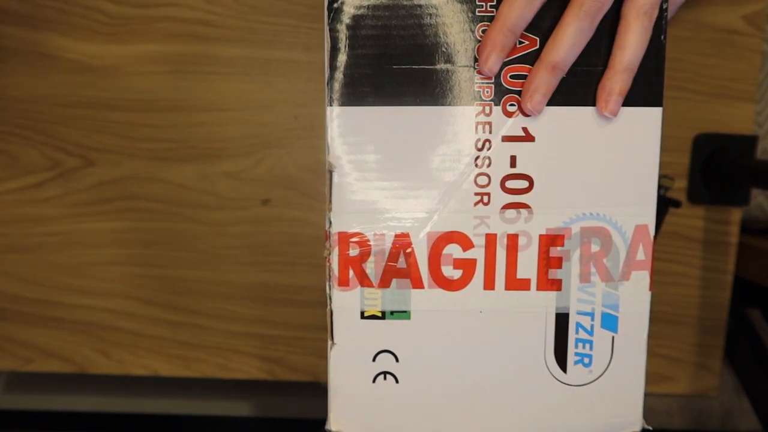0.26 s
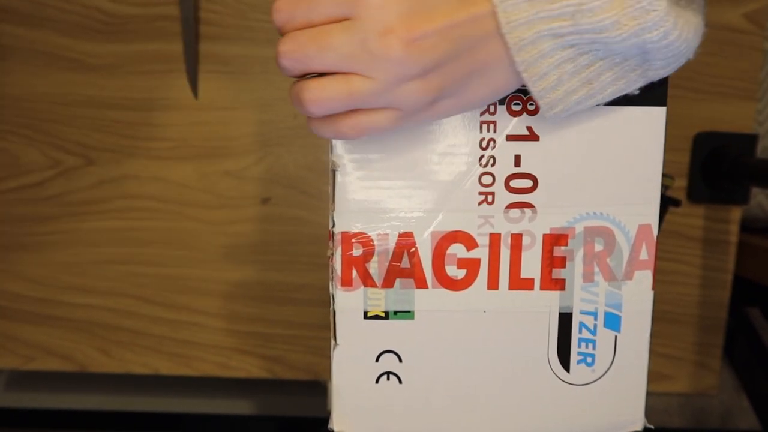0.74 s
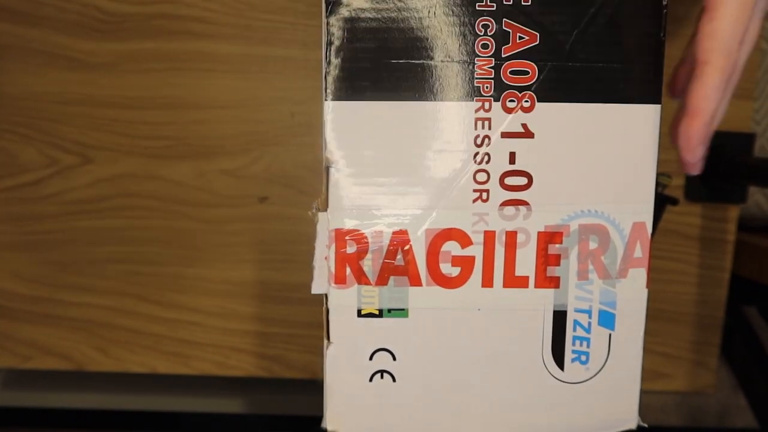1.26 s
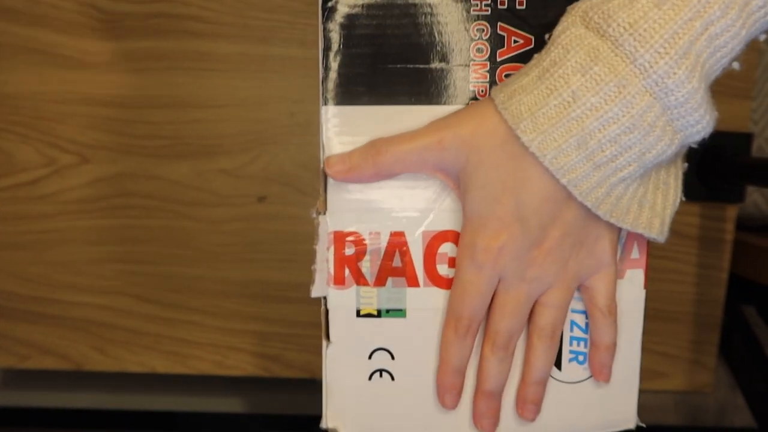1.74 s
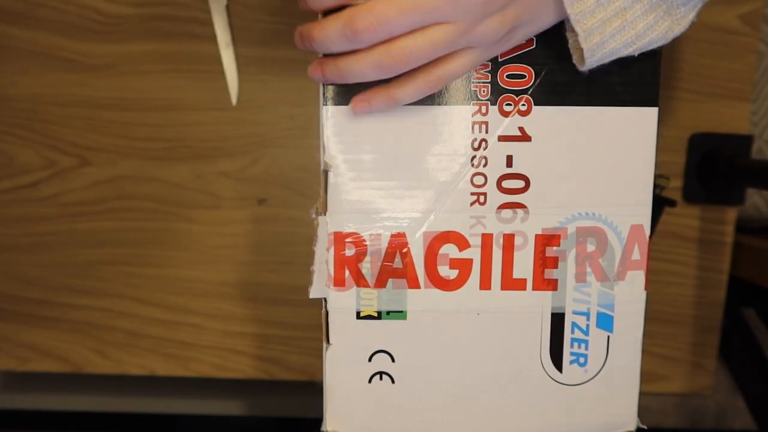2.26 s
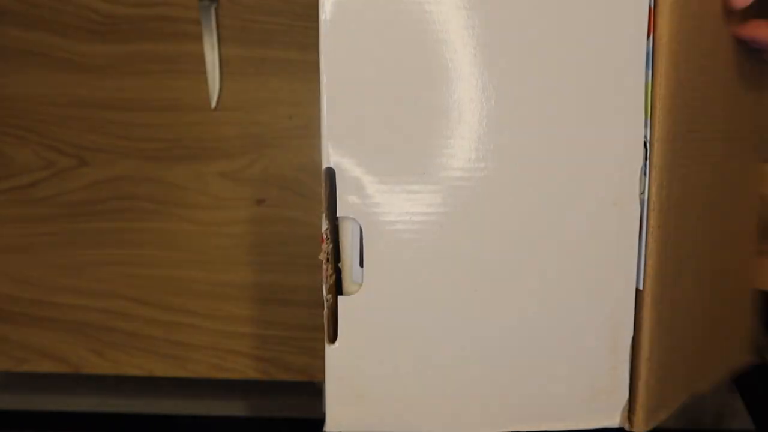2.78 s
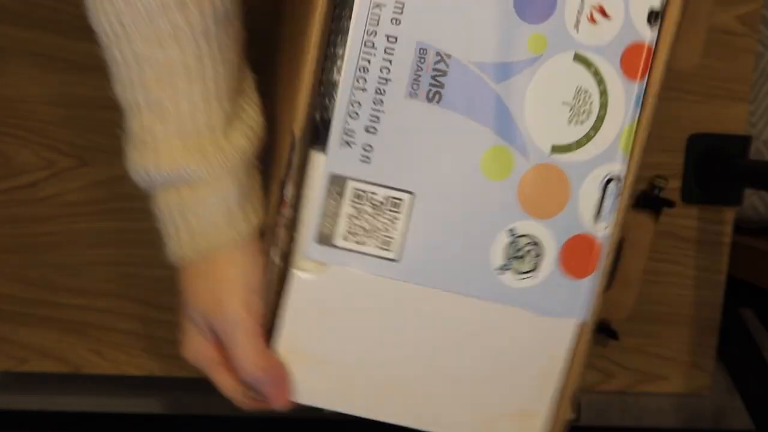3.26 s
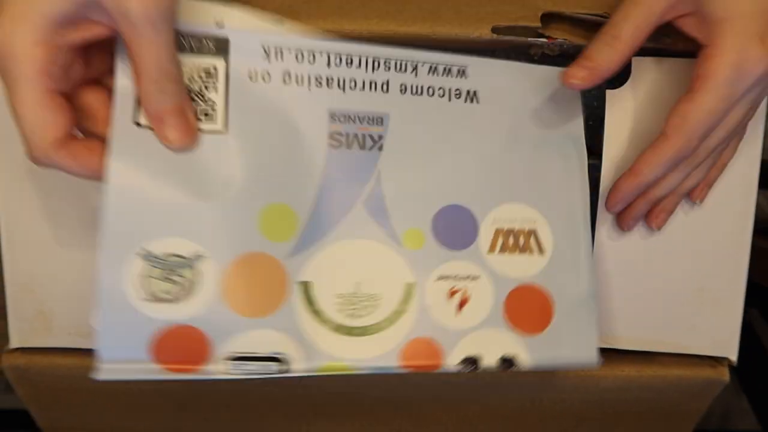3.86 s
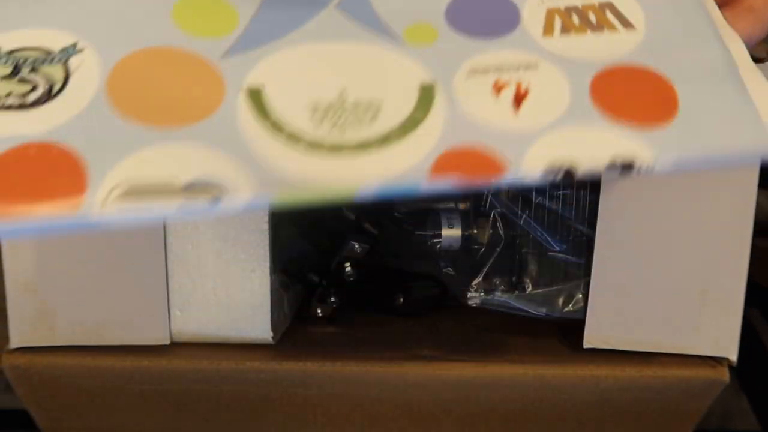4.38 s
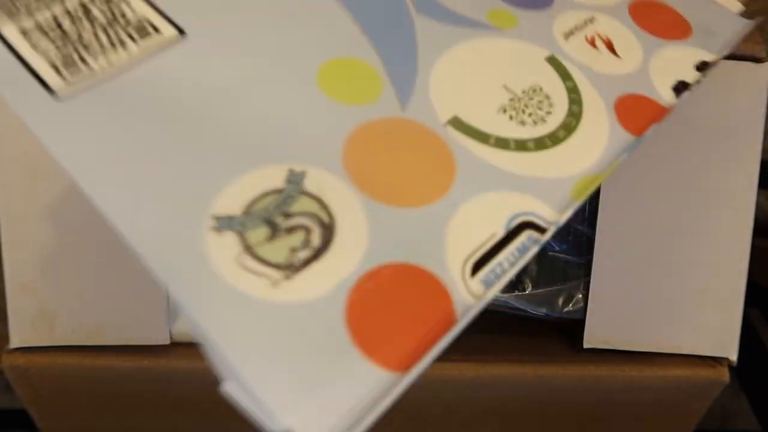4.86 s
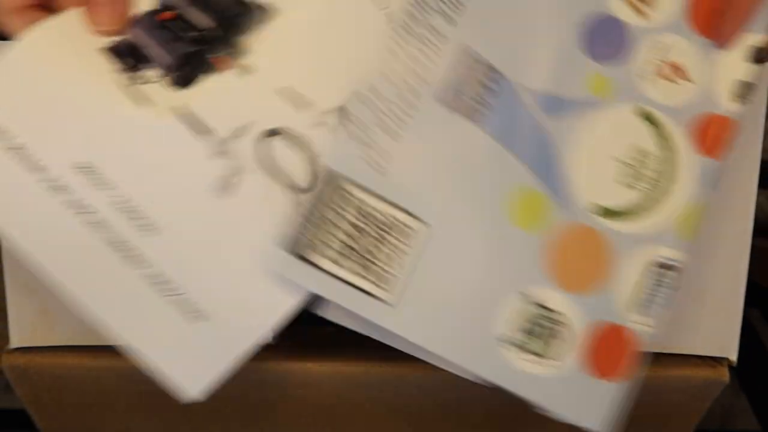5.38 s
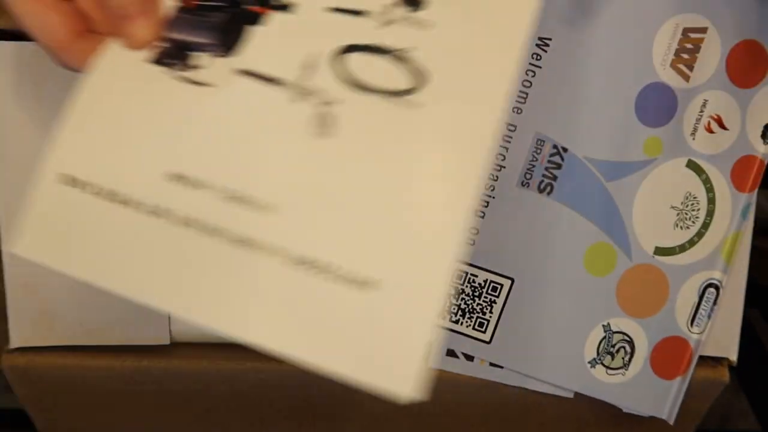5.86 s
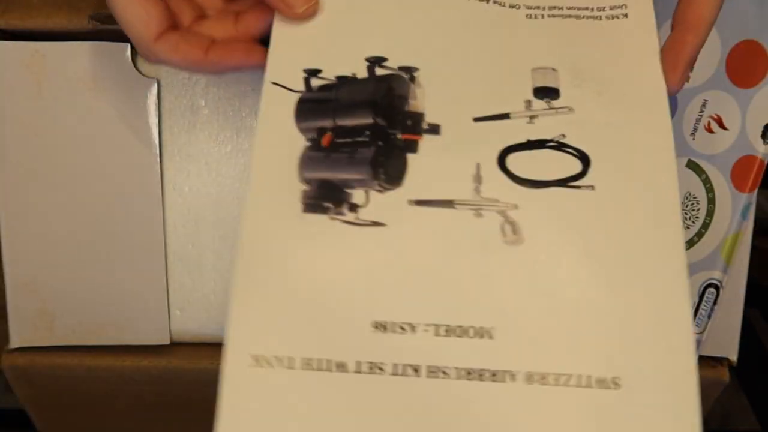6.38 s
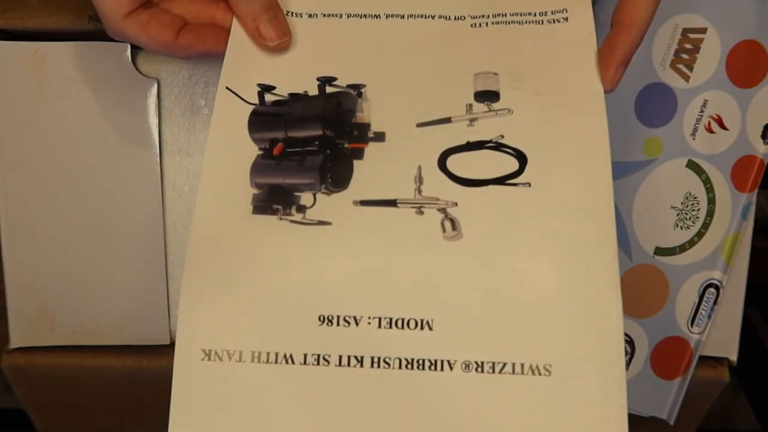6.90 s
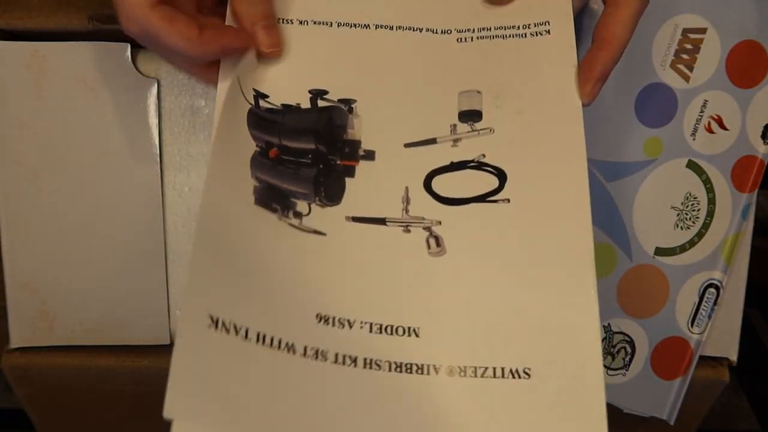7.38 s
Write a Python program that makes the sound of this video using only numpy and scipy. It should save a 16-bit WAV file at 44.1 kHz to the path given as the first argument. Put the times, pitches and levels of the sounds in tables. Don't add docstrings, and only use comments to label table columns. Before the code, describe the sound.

Close handling of a carton: jerky hollow scrapes and taps, small snaps of tape, then thin sheets crinkling and sliding, fading to soft paper rustles.

```python
import sys
import numpy as np
from scipy import signal
from scipy.fft import rfft, irfft, next_fast_len
from scipy.io import wavfile

SR = 44100
rng = np.random.default_rng(int(sys.argv[2]) if len(sys.argv) > 2 else 0)


def ratio_of_db(decibels):
    return 10 ** (np.asarray(decibels, float) / 20)


def put_to_file(sound):
    columns = np.atleast_2d(sound).T
    safe = np.clip(columns, -1, 1)
    whole_steps = np.round(safe * 32767)
    wavfile.write(sys.argv[1], SR, whole_steps.astype(np.int16))


N = 336818
BAND_EDGES_HZ = 400 * 1.085 ** np.arange(47) - 365


def in_time(rows):
    s, *columns = np.transpose(rows)
    return np.array([np.interp(np.arange(N) / SR, s, column) for column in columns])


def at_hz(points, hz):
    point_hz, point_db = np.array(points).T
    return np.interp(np.log(hz), np.log(point_hz), point_db)


def rms_one(x):
    return x / np.sqrt(np.mean(x ** 2) + 1e-20)


def drift(rate_hz):
    r = np.exp(-2 * np.pi * rate_hz * 40 / SR)
    slow = signal.lfilter([1], [1, -2 * r, r * r], rng.standard_normal(N // 40 + 2002))[2000:]
    return np.interp(np.arange(N) / 40, np.arange(len(slow)), rms_one(slow))


def ring(push, hz, t60):
    r, w = ratio_of_db(-60 / (t60 * SR)), 2 * np.pi * hz / SR
    radiated = np.sqrt(0.5 - 0.5 * r * r) * np.array([1, 0, -1])
    return signal.lfilter(radiated, [1, -2 * r * np.cos(w), r * r], push + 1e-18)


def soft(x, hz):
    return signal.sosfilt(signal.butter(2, min(hz, 9000), fs=SR, output="sos"), x)


def grains(per_s, spread_db, smooth):
    caught = rng.random(N) < per_s / SR
    sizes = ratio_of_db(spread_db * np.minimum(rng.exponential(1, N), 4)) * caught
    return rms_one(smooth + rms_one(sizes))


def crackle(per_s, strength):
    flipped = rng.random(N) < per_s / SR
    flips = strength * np.minimum(rng.exponential(1, N), 2) * flipped
    return 1 + signal.lfilter([1], [1, -np.exp(-1 / (0.0024 * SR))], flips)


def bank(gains, side_table, sizes):
    out = np.zeros((2, N))
    white = sizes * rng.standard_normal((2, 2, N))
    for k, (low, high) in enumerate(zip(BAND_EDGES_HZ, BAND_EDGES_HZ[1:])):
        band = signal.butter(2, [low, high], "band", fs=SR, output="sos")
        mid, side = signal.sosfilt(band, gains[k] * white[k % 2])
        out += mid + ratio_of_db(at_hz(side_table, low)) * side * [[1], [-1]]
    return out


def stroke(s, rise, fall):
    at = np.arange(max(round((s - 0.16) * SR), 0), min(round((s + 0.2) * SR), N))
    t = at / SR - s
    swell = (-t / max(rise, 1e-3)) ** 2.92
    decay = abs(t / max(fall, 1e-3)) ** 1.05
    return at, np.exp(-0.9 * np.where(t < 0, swell, decay))


# peak in seconds, swell in seconds, panel level in dB, panel pitch in Hz.
JOLTS = [(0.08, 0.0036, -59.5, 191), (0.275, 0.011, -28, 450), (0.318, 0.011, -32.5, 183),
         (0.376, 0.022, -30, 303), (0.459, 0.015, -26.5, 386), (0.504, 0.0073, -26, 182),
         (0.558, 0.012, -26, 160), (0.604, 0.025, -33.5, 217), (1.374, 0.017, -35.5, 340),
         (1.63, 0.0088, -27.5, 312), (1.679, .011, -31, 166), (1.77, 0.012, -32, 363),
         (1.805, 0.011, -22, 312), (1.928, 0.057, -36, 340), (1.97, 0.0091, -31, 197),
         (2.216, 0.0092, -56, 780), (2.388, 0.018, -36, 356), (2.562, 0.018, -34.5, 177),
         (2.65, 0.047, -51.5, 168), (4.293, 0.0092, -82, 600)]
# peak in seconds, fall in seconds, panel level in dB, panel pitch in Hz.
TAPS = [(0.405, 0.0075, -29.5, 160), (0.862, 0.012, -44, 184), (1.069, 0.0036, -42, 1500),
        (1.288, 0.013, -52.5, 257), (1.465, 0.0033, -18, 327), (1.55, 0.0048, -35, 160),
        (1.712, 0.0071, -15.5, 200), (2.03, 0.0064, -44, 1400), (2.072, 0.0044, -36, 1520),
        (2.134, .0086, -32.5, 555), (2.509, 0.0055, -35, 214), (2.691, 0.014, -29, 174),
        (2.958, 0.0029, -50, 1020), (3.766, 0.039, -47.5, 337), (3.901, 0.014, -24, 630),
        (4.236, 0.013, -29, 800), (5.209, 0.0054, -44, 124), (5.622, 0.02, -42.5, 940),
        (6.18, 0.018, -54, 620), (6.261, 0.013, -60.5, 816), (7.032, 0.013, -52, 1070)]
# peak in seconds, rise in seconds, fall in seconds, panel level in dB, panel pitch in Hz.
SCRAPES = [(0.247, 0.014, .022, -44.5, 696), (0.741, 0.015, .069, -62.5, 436),
           (0.81, 0.02, .022, -45.5, 900), (0.935, 0.023, .016, -51.5, 303),
           (0.983, 0.014, .03, -43.5, 770), (1.43, 0.009, .024, -56, 318), (1.851, 0.0074, .02, -38.5, 357),
           (1.884, 0.0077, 0.0038, -22.5, 384), (2.104, 0.019, .033, -46, 690),
           (2.297, 0.011, .033, -30.5, 733), (2.746, 0.0033, .051, -48, 212),
           (3.034, 0.0093, .021, -49, 123), (3.4, 0.08, .075, -44, 645), (3.627, 0.0054, .064, -51, 300),
           (3.705, 0.017, .036, -56.5, 314), (3.855, 0.019, .14, -46.5, 623),
           (3.968, 0.039, .019, -37.5, 1080), (4.877, 0.019, .012, -50, 322),
           (5.645, 0.045, .036, -52, 700), (5.85, 0.012, .022, -43, 736), (6.849, .02, 0.03, -63, 744),
           (7.432, 0.011, .032, -45, 1460), (7.602, 0.0031, .037, -57.5, 810)]
# peak in seconds, rise in seconds, fall in seconds, scratch level in dB, thinness in dB.
BRUSHES = [(1.576, .0011, .0092, -37.5, -2.5), (2.339, 0.012, .006, -38, 5),
           (2.826, 0.0039, 0.036, -59.5, -4.5), (3.2, 0.015, 0.041, -48.5, 24.5),
           (3.253, 0.0206, 0.011, -49.5, 20.5), (3.58, 0.016, 0.0094, -56, -2),
           (4.102, .02, 0.036, -48.5, 8), (4.496, 0.026, 0.012, -57, 6), (4.651, 0.0011, 0.056, -55, 2),
           (4.671, .001, 0.0025, -53, 20), (4.78, 0.044, 0.0029, -75, 46), (4.928, 0.011, 0.041, -57, 4),
           (5.024, .0037, 0.0062, -50, 3), (5.053, 0.0129, 0.033, -52, 18), (5.137, 0.0043, 0.054, -63, 18),
           (5.243, 0.02, 0.015, -54, 3.5), (5.423, 0.046, 0.035, -48.5, 24),
           (7.219, 0.048, 0.0083, -47, 4.5), (7.298, 0.041, 0.14, -57, 7.5)]


def scuffs():
    def scratch(base_db, panel_db):
        return base_db - 0.11 * (panel_db + 42.5)

    jolts = [(s, swell, 0.0067 + 0.05 * swell, db, hz, scratch(-12, db)) for s, swell, db, hz in JOLTS]
    taps = [(s, 0.0026, fall, db, hz, scratch(-11, db)) for s, fall, db, hz in TAPS]
    scrapes = [(s, rise, fall, db, hz, scratch(-6, db)) for s, rise, fall, db, hz in SCRAPES]
    sheet_hz = 800
    brushes = [(s, rise, fall, db - thin_db, sheet_hz, thin_db) for s, rise, fall, db, thin_db in BRUSHES]
    return jolts + taps + scrapes + brushes


# pitch in Hz, level in dB, t60 in seconds.
BOX_MODES = [(75, -7.5, 0.021), (160, 1, 0.05), (340, -0.5, 0.02), (608, -3, 0.011), (900, -21.5, 0.014)]


def panels():
    rough = grains(per_s=1500, spread_db=4.0, smooth=0.94) * rng.standard_normal(N)
    contacts, out = scuffs(), np.zeros(N)
    share_db = rng.normal(0, 5.0, (len(contacts), len(BOX_MODES)))
    for (s, rise, fall, panel_db, hz, _), own_db in zip(contacts, share_db):
        at, shape = stroke(s - 0.002, rise, fall)
        push = soft(shape * rough[at], 500 + 0.73 * hz)
        rung = ring(push, hz, 10.0 / hz) + 0.13 * ring(push, 0.38 * hz, 3.5 / hz)
        for (mode_hz, mode_db, t60), chance_db in zip(BOX_MODES, own_db):
            reach_db = -5.0 * abs(np.log2(mode_hz / hz))
            rung += ratio_of_db(mode_db + reach_db + chance_db - 0.5) * ring(push, mode_hz, t60)
        out[at] += ratio_of_db(panel_db) * np.sqrt(np.sum(shape ** 2) / np.sum(rung ** 2)) * rung
    return out


# time in seconds, box on the desk in dB, skin and sheets in dB.
SLIDE = [(0.0, -68, -53), (0.06, -73, -78), (0.2, -67, -97), (0.42, -49, -66), (0.62, -58, -78),
         (1.25, -74, -71.5), (1.76, -44.5, -53.5), (2.25, -72, -66), (2.8, -92, -60.5), (3.76, -73, -68.5),
         (4.12, -79, -50), (4.37, -46.5, -61.5), (4.55, -78, -65.5), (5.34, -64.5, -58), (5.95, -77, -79),
         (7.05, -75, -78), (7.3, -77, -67), (7.64, -73, -66)]
# frequency in Hz, level in dB per Hz.
SCRATCH = [(100, 6), (600, -5), (1200, -2), (2200, -2), (3500, -9.5), (6000, -14.5), (10000, -25),
           (15000, -33)]
# frequency in Hz, level in dB.
SLIDE_COLOUR = [(60, -13.5), (160, -2.5), (400, -3.5), (1600, -5), (5000, -4.5), (11000, -9), (15000, -13.5)]
# frequency in Hz, level in dB.
BOARD_DRAG = [(190, 1.5), (950, -8.5), (3300, -9), (9000, -26.5)]
# frequency in Hz, level in dB.
SHEET_RUB = [(190, -15.5), (950, -4.5), (3300, -4.5), (9000, -9)]
# frequency in Hz, side minus mid in dB.
SIDE_NEAR = [(200, -31), (1500, -15), (4000, -8.5), (9000, -1.5), (15000, 4)]


def friction():
    centres = np.sqrt(BAND_EDGES_HZ[1:] * BAND_EDGES_HZ[:-1])
    board, sheet = ratio_of_db(in_time(SLIDE)) ** 2
    gains = np.zeros((len(centres), N))
    contacts = scuffs()
    colour_db = rng.normal(0, 2.2, (len(contacts), len(centres)))
    for (s, rise, fall, panel_db, _, scratch_db), own_db in zip(contacts, colour_db):
        at, shape = stroke(s - 0.001, 1.2 * rise, 0.92 * fall)
        tilt_db = 0.24 * (scratch_db + 0.5) * np.log2(np.maximum(centres, 700) / 2000)
        band_db = panel_db + scratch_db + 12 + at_hz(SCRATCH, centres) + tilt_db + own_db
        gains[:, at] += np.outer(ratio_of_db(band_db), shape) ** 2
    together = ratio_of_db(3 * drift(14))
    creases = [crackle(per_s=41, strength=0.69) for group in range(8)]
    for k, hz in enumerate(centres):
        power = board * ratio_of_db(2 * at_hz(BOARD_DRAG, hz)) + sheet * ratio_of_db(2 * at_hz(SHEET_RUB, hz))
        unsteady = (together * ratio_of_db(at_hz(SLIDE_COLOUR, hz))) ** 2
        gains[k] += power * unsteady * SR / 2 / (0.75 * hz)
        patches = ratio_of_db(3.2 * drift(12.5))
        gains[k] = np.sqrt(gains[k]) * creases[k // 6] * patches
    return bank(gains, SIDE_NEAR, grains(per_s=4200, spread_db=2.5, smooth=1.0))


# start in seconds, peak level in dB, pitch in Hz, t60 in seconds.
KNOCKS = [(0.399, -23, 151, 0.057), (2.296, -23.5, 212, 0.061), (2.503, -30, 218, 0.06),
          (2.544, -29, 220, 0.13), (3.078, -36.5, 373, 0.057), (3.102, -40.5, 413, 0.054),
          (3.125, -43, 400, 0.042), (3.14, -36.5, 496, 0.034), (6.76, -39.5, 225, 0.054),
          (6.828, -33, 251, 0.02), (2.692, -22, 800, 0.015), (4.229, -17, 642, 0.07),
          (4.2292, -14, 800, 0.018), (4.265, -21.5, 605, 0.086), (4.292, -22, 634, 0.084),
          (5.272, -25, 774, 0.032), (5.595, -34, 890, 0.049), (6.84, -35.5, 325, 0.049),
          (7.444, -37.5, 284, 0.045), (3.824, -24, 660, 0.02), (3.817, -38, 300, 0.04),
          (6.762, -48, 760, 0.05), (6.708, -58, 750, 0.06), (7.447, -36, 1000, .03),
          (3.9, -18.5, 610, 0.025)]


def knocks():
    out, t = np.zeros(N + SR), np.arange(SR // 5) / SR
    onset = 1 - np.exp(-t / 0.0005)

    def tone(hz):
        return np.sin(2 * np.pi * hz * t)

    for s, peak_db, hz, t60 in KNOCKS:
        modes = tone(hz) + 0.6 * tone(1.42 * hz) * ratio_of_db(-90 * t / t60)
        modes += 0.31 * tone(1.2 * hz) * ratio_of_db(-40 * t / t60)
        modes += 0.18 * (tone(200) + tone(370)) * ratio_of_db(25 * t / t60)
        out[round(s * SR):][:len(t)] -= ratio_of_db(peak_db - 0.5 - 60 * t / t60) * modes * onset
    return soft(out[:N], 1600)


# start in seconds, peak level in dB, pitch in Hz.
SNAPS = [(1.4584, -40, 2100), (1.5723, -45, 3300), (2.0697, -35, 1960), (2.2794, -26, 2900),
         (2.3743, -30.5, 3130), (2.386, -21.5, 5850), (2.6915, -20, 2600), (3.851, -35.5, 2680),
         (3.8874, -25.5, 2160), (3.9061, -19.5, 2650), (1.282, -50, 3500), (2.958, -51, 3440),
         (4.045, -36.5, 2960), (4.673, -32, 3030), (4.8615, -29, 2600), (4.8771, -25, 2800),
         (5.024, -34, 2530), (5.6167, -38.5, 3500), (5.8389, -34, 3160), (6.76, -54, 1500),
         (6.845, -41, 1550), (2.3002, -22, 2200), (2.322, -27, 3500), (2.336, -25, 2800),
         (2.397, -38, 5000), (2.525, -40, 1900), (2.8245, -42, 2640), (3.371, -36, 1100),
         (3.419, -36, 1300), (3.9619, -34, 3630), (4.6453, -43, 3140), (4.702, -44, 900),
         (4.9247, -42, 2580), (5.243, -40, 4510), (5.5962, -40, 3040), (5.686, -51, 3520),
         (5.8465, -30, 2600), (6.1315, -61, 1500), (6.183, -46, 800), (7.1781, -35, 1800), (7.2, -37, 1600),
         (7.2215, -35, 3740), (7.2978, -32, 2850), (7.313, -35, 2900), (0.9348, -42, 3090)]


def snaps():
    out, chance = np.zeros((2, N + 1000)), rng.standard_normal((len(SNAPS), 601))
    t = np.arange(600) / SR
    for (s, peak_db, hz), (lag, *noise) in zip(SNAPS, chance):
        fibres = np.where(np.abs(noise) > 1.9, noise, 0) * np.exp(-t / 0.002)
        fibres[0] = 2.5
        sound = ring(fibres, hz, 24.0 / hz) + 0.48 * ring(fibres, 0.56 * hz, 1.4 / hz)
        sound = ratio_of_db(peak_db + 3) * soft(soft(sound, 2.6 * hz), 3 * hz) / np.abs(sound).max()
        for side, sign in enumerate((1, -1)):
            at = round(s * SR + 0.8 * sign * np.clip(lag, -2, 2))
            out[side, at:at + 600] += sound
    return out[:, :N]


# centre in seconds, pitch in Hz, level in dB.
CHIRPS = [(0.373, 985, -35.5), (0.377, 2030, -37.5), (0.863, 1580, -50), (0.94, 3000, -52.5),
          (1.067, 1800, -45), (1.071, 3820, -49.5), (1.463, 2110, -55), (1.624, 2400, -65),
          (1.712, 1640, -34), (1.717, 690, -29.5), (1.882, 2200, -51), (2.071, 1700, -53),
          (2.289, 2500, -36), (2.559, 1340, -35.5), (2.699, 2870, -43), (4.06, 850, -71),
          (4.324, 673, -39.5), (5.248, 4470, -50), (5.365, 2880, -52.5), (5.424, 4700, -41.5),
          (7.426, 3400, -48), (1.114, 620, -43)]
# centre in seconds, half length in seconds, pitch in Hz, level in dB.
DRAWS = [(0.551, 0.014, 2400, -55), (0.989, 0.011, 1940, -44), (1.818, 0.012, 690, -46),
         (2.529, 0.014, 2250, -51), (3.916, 0.011, 2880, -41), (3.923, 0.031, 725, -44),
         (4.077, 0.058, 1660, -41.5), (4.082, .052, 2740, -48.5), (4.166, 0.11, 783, -46),
         (4.202, 0.026, 1920, -47.5), (4.209, 0.021, 4050, -47.5), (5.049, 0.0099, 2710, -49.5),
         (5.226, 0.032, 1870, -52.5), (5.624, 0.012, 3480, -48), (7.188, .016, 4350, -50.5),
         (7.236, 0.032, 3460, -49.5), (7.309, .027, 2890, -45)]


def sings():
    out, rub = np.zeros(N), crackle(per_s=290, strength=1.6) * rng.standard_normal(N)
    chirps = [(s, 0.0045, hz, db) for s, hz, db in CHIRPS]
    for s, half, hz, level_db in chirps + DRAWS:
        at, shape = stroke(s - 0.002, half, half)
        tone = ring(ring(shape * rub[at], hz, 8.8 / hz), hz, 8.8 / hz)
        out[at] += ratio_of_db(level_db + 3.5) * np.sqrt(np.sum(shape ** 2) / np.sum(tone ** 2)) * tone
    return out


# start in seconds, peak level in dB, pitch in Hz.
TICKS = [(0.2448, -41, 5210), (0.3057, -39, 5080), (0.5043, -38, 6560), (0.8619, -44, 5260),
         (0.9178, -37, 8340), (1.3884, -49, 8000), (1.4561, -38, 5720), (1.5723, -32, 5990),
         (1.6202, -37, 5180), (1.6591, -51, 5170), (1.6974, -38, 5610), (1.7165, -33, 5390),
         (1.7414, -48, 5520), (1.8622, -31, 5250), (2.0687, -44, 12500), (2.3191, -34, 5540),
         (2.6289, -54, 13300), (2.7442, -48, 13700), (2.9562, -52, 5790), (3.5194, -62, 13400),
         (3.6611, -59, 5420), (4.6703, -39, 7920), (4.7714, -51, 10300), (5.0863, -41, 5850),
         (5.1374, -53, 5950), (5.2724, -47, 6930), (5.3624, -38, 6200), (6.1315, -65, 5720),
         (7.1367, -52, 5670)]
# centre in seconds, half length in seconds.
PEELS = [
    (2.645, .025),
    (2.768, 0.028),
    (2.842, 0.016),
    (2.955, 0.013),
    (3.03, 0.046),
]


def tape():
    t, out = np.arange(N) / SR, np.zeros((2, N))

    def both(mid, side):
        return mid + 0.7 * side * np.array([[1], [-1]])

    for (s, peak_db, hz), noise in zip(TICKS, rng.standard_normal((len(TICKS), 2, 400))):
        edges = [hz * 2 ** -0.3, min(2.4 * hz, 17000)]
        band = signal.butter(2, edges, "band", fs=SR, output="sos")
        tick = signal.sosfilt(band, both(*noise) * np.exp(-t[:400] / 0.0008))
        out[:, round(s * SR):][:, :400] += ratio_of_db(peak_db - 0.2) * tick / np.abs(tick).max()
    peel = ratio_of_db(-64) * sum(np.exp(-((t - s) / half) ** 4) for s, half in PEELS)
    hiss = peel * both(*rng.standard_normal((2, N))) + 1e-18
    return out + signal.sosfilt(signal.butter(4, 11500, "high", fs=SR, output="sos"), hiss)


# centre in seconds, half length in seconds, pitch in Hz, level in dB.
RUSTLES = [(0.272, 0.025, 140, -41), (0.274, 0.009, 2280, -39), (0.277, 0.02, 200, -40),
           (0.365, 0.02, 9130, -59), (0.38, 0.007, 2280, -42), (0.421, 0.012, 200, -35),
           (0.455, 0.04, 140, -37), (0.471, 0.034, 140, -36), (0.549, 0.01, 140, -33),
           (0.6, 0.011, 810, -41), (0.864, 0.008, 9130, -64), (0.92, 0.008, 9130, -57),
           (1.471, 0.012, 140, -34), (1.574, 0.008, 9130, -53), (1.594, 0.014, 290, -42),
           (1.635, 0.015, 140, -39), (1.711, 0.013, 100, -34), (1.714, 0.012, 6460, -49),
           (1.79, 0.006, 290, -33), (1.814, 0.008, 810, -37), (1.864, 0.008, 9130, -53),
           (1.889, 0.011, 400, -29), (1.998, 0.009, 1610, -55), (2.15, 0.005, 570, -44),
           (2.291, 0.018, 9130, -48), (2.301, 0.028, 4570, -41), (2.315, 0.04, 2280, -41),
           (2.322, 0.013, 200, -36), (2.382, 0.013, 140, -42), (2.384, 0.013, 9130, -51),
           (2.542, 0.006, 1140, -47), (2.559, 0.015, 200, -36), (2.693, 0.009, 290, -38),
           (3.261, 0.016, 570, -58), (3.269, 0.01, 1610, -52), (3.414, 0.012, 570, -43),
           (3.825, 0.012, 200, -39), (3.906, 0.025, 9130, -54), (3.911, 0.02, 6460, -48),
           (4.105, 0.01, 1610, -38), (4.199, 0.011, 810, -39), (4.212, 0.016, 9130, -51),
           (4.231, 0.009, 1140, -29), (4.295, 0.009, 1140, -39), (4.425, 0.029, 6460, -65),
           (4.885, 0.014, 4570, -57), (5.196, 0.02, 9130, -58), (5.354, 0.01, 290, -55),
           (5.369, 0.019, 9130, -59), (6.847, 0.015, 200, -47),
           (1.2, .014, 5000, -68), (2.257, .012, 4000, -60), (4.085, .04, 5000, -51),
           (4.13, .11, 2200, -48), (2.318, .036, 1500, -39), (.276, .016, 9000, -58),
           (.457, .016, 9000, -58), (.555, .016, 10000, -60), (.82, .03, 10000, -68),
           (3.87, .02, 6000, -55), (4.205, .024, 5500, -47), (5.04, .014, 7000, -53),
           (5.51, .015, 6000, -66), (5.78, .03, 5000, -70), (6.2, .018, 8000, -75), (6.7, .035, 7000, -75),
           (6.875, .04, 1600, -61), (7.045, .015, 8000, -74)]


def rustles():
    out, rub = np.zeros((2, N)), crackle(per_s=250, strength=1.2) * rng.standard_normal((2, N))
    half_band = 2 ** 0.45
    for s, half, hz, level_db in RUSTLES:
        at, _ = stroke(s, half, half)
        shape = np.exp(-((at / SR - s - 0.002) / max(half - 0.005, 0.002)) ** 4)
        band = signal.butter(2, [hz / half_band, hz * half_band], "band", fs=SR, output="sos")
        mid, side = signal.sosfilt(band, shape * rub[:, at])
        gain = ratio_of_db(level_db - 0.4) * np.sqrt(np.sum(shape ** 2) / np.sum(mid ** 2))
        out[:, at] += gain * (mid + ratio_of_db(at_hz(SIDE_NEAR, hz)) * side * [[1], [-1]])
    return out


def room(x):
    t60_s, wall_cut_hz = 0.11, 12000
    size = next_fast_len(N + SR)
    hz = np.arange(size // 2 + 1) * SR / size
    lags = rng.uniform(0.0036, 0.032, (2, 6, 1))
    loop = ratio_of_db(-60 * lags / t60_s) / (1 + 1j * hz / wall_cut_hz) * np.exp(-2j * np.pi * hz * lags)
    return irfft(rfft(x, size) * np.sum(loop / (1 - loop), axis=1), size)[:, :N]


# frequency in Hz, level in dB.
HUSH = [(18, -35), (30, 8), (145, -6), (616, -14), (780, -12.5), (913, -14), (2680, -18.5), (12600, -35),
        (16000, -50)]
# frequency in Hz, side minus mid in dB.
SIDE_HUSH = [(60, -8.5), (300, 15.5), (640, 8), (3000, 5.5), (15000, -0.5)]


def hush():
    return ratio_of_db(-67) * rms_one(bank(ratio_of_db(at_hz(HUSH, BAND_EDGES_HZ + 15)), SIDE_HUSH, 1))


# time in seconds, left minus right in dB.
PLACE = [(0.0, -2.0), (0.15, 0.5), (2.17, -1.0), (2.25, 1.0), (2.59, 0.0), (2.74, -3.5), (3.04, 1.5),
         (3.36, -0.5), (4.93, 1.0), (5.08, -1.0), (7.42, 0.5), (7.64, -0.5)]


def scene():
    near = panels() + friction() + knocks() + snaps() + sings() + tape() + rustles()
    pan_db = in_time(PLACE)[0]
    treble = near - soft(near, 700)
    near = near + treble * (ratio_of_db([pan_db / 2, -pan_db / 2]) - 1)
    near = signal.sosfilt(signal.butter(2, 60, "high", fs=SR, output="sos"), near)
    return near + ratio_of_db(-20.5) * room(near.mean(axis=0)) + hush()


def band_limit(x):
    return signal.sosfilt(signal.butter(12, 15900, fs=SR, output="sos"), x)


def record(dry):
    mix = signal.sosfilt(signal.butter(2, 28, "high", fs=SR, output="sos"), dry)
    mix = signal.sosfilt(signal.cheby1(8, 1, 15600, fs=SR, output="sos"), mix)
    return band_limit(mix)


dry = scene()
out = record(dry)
put_to_file(out)
```